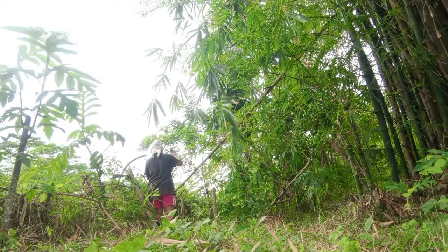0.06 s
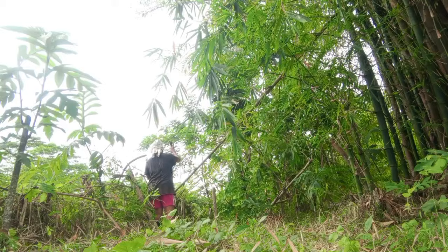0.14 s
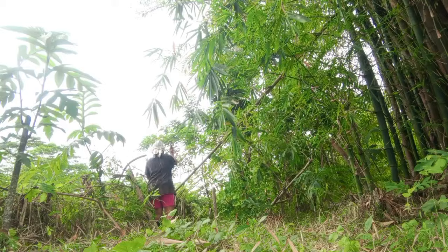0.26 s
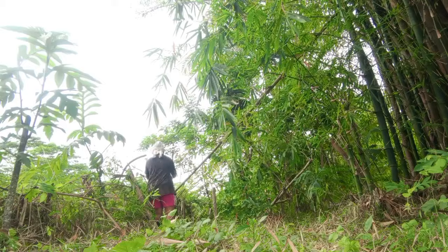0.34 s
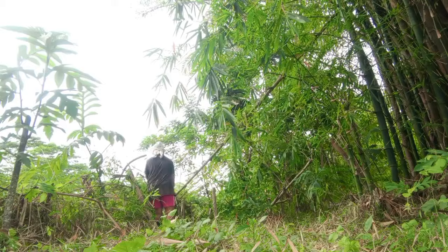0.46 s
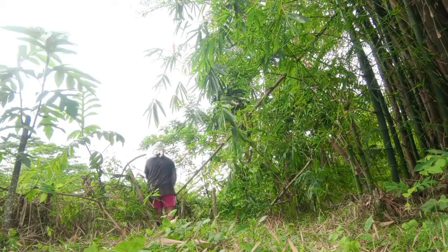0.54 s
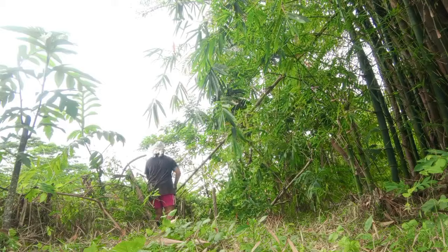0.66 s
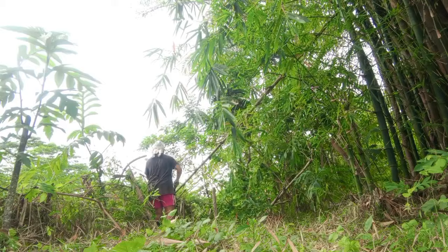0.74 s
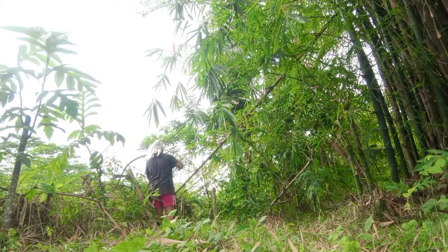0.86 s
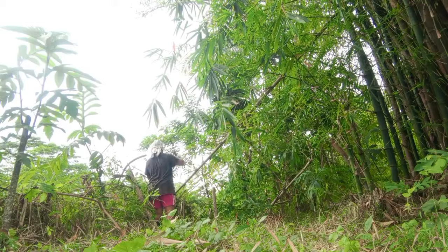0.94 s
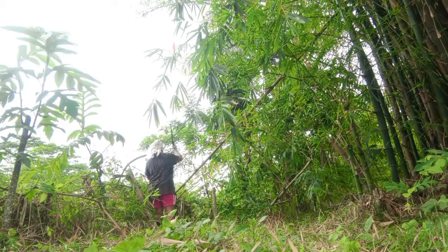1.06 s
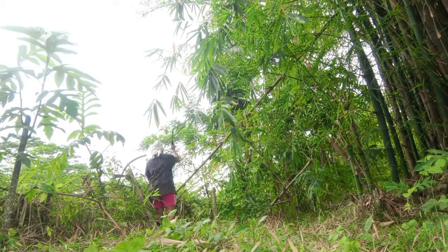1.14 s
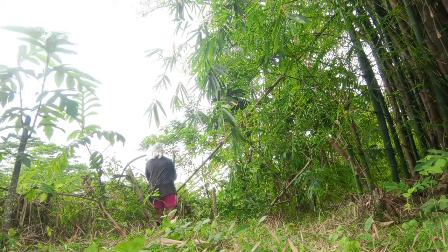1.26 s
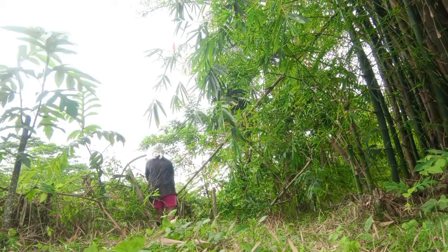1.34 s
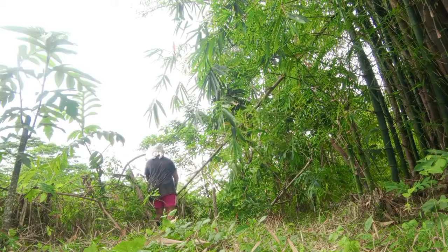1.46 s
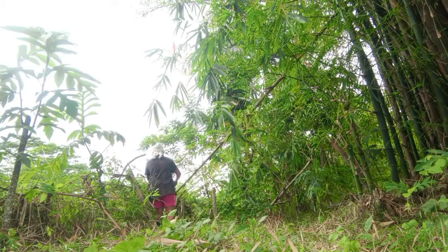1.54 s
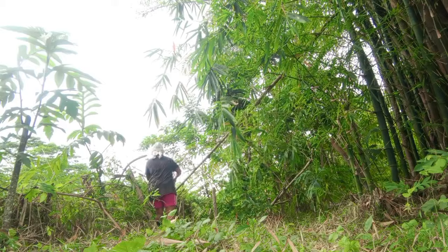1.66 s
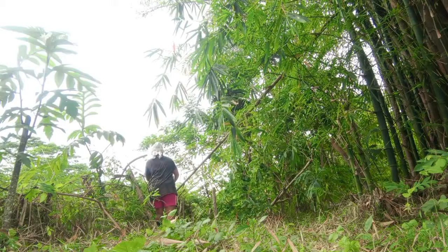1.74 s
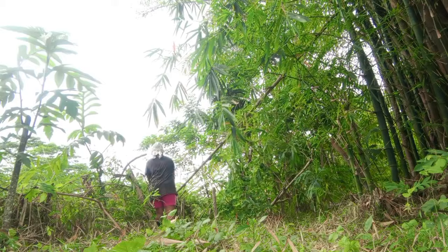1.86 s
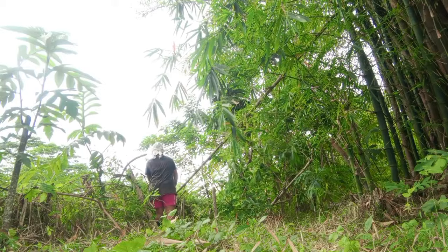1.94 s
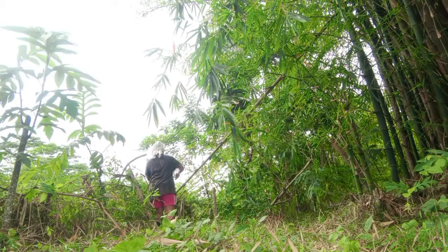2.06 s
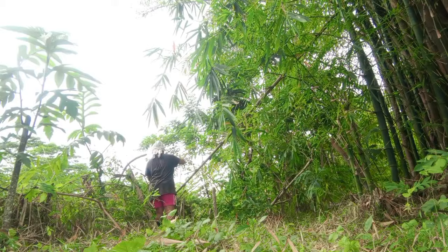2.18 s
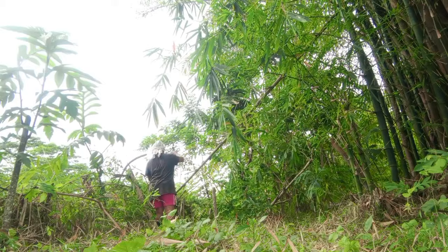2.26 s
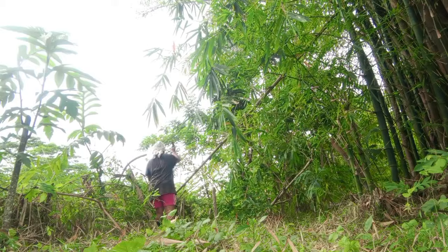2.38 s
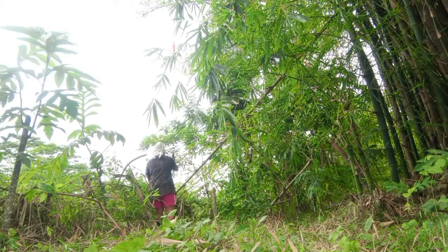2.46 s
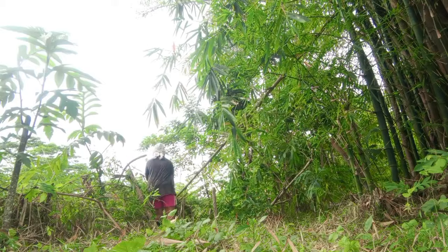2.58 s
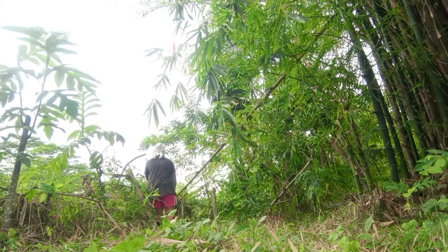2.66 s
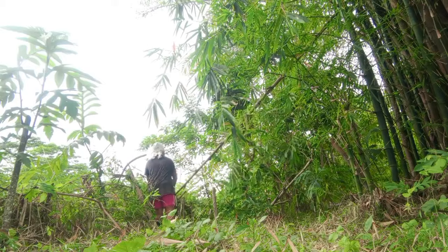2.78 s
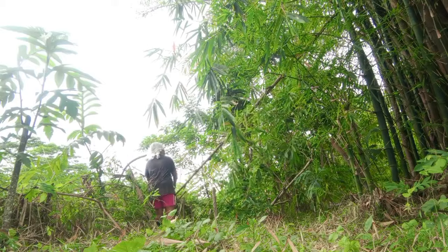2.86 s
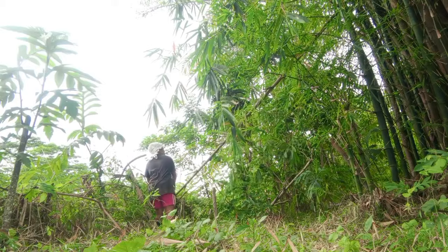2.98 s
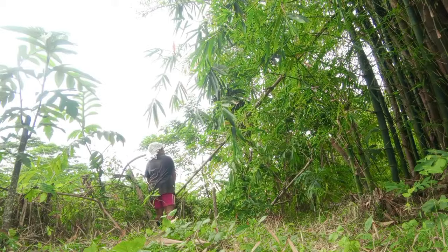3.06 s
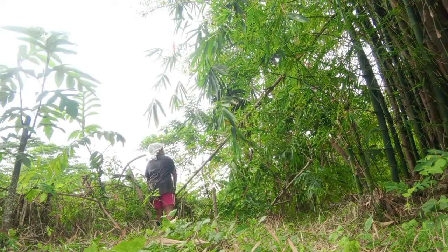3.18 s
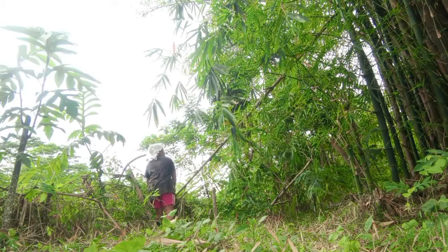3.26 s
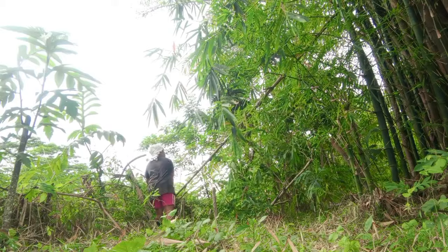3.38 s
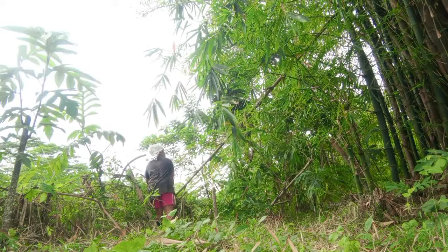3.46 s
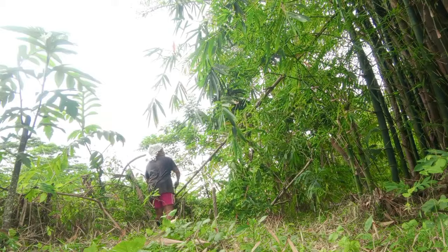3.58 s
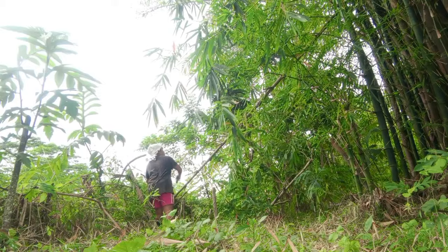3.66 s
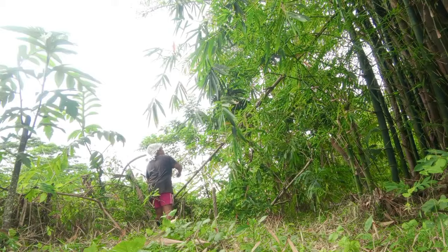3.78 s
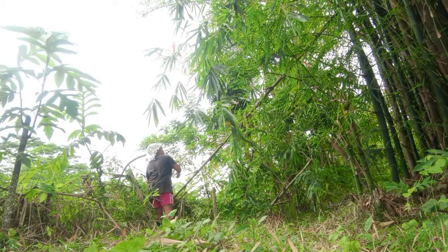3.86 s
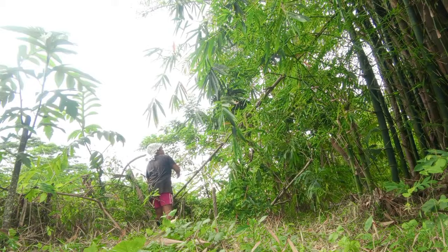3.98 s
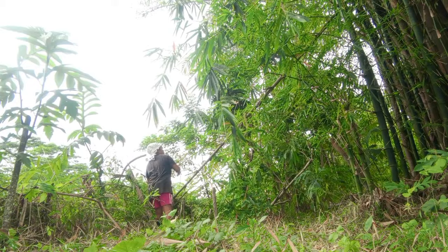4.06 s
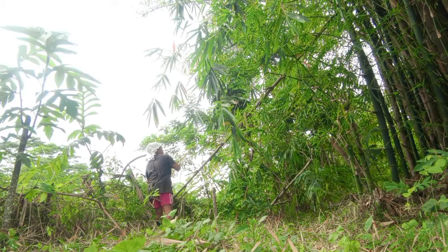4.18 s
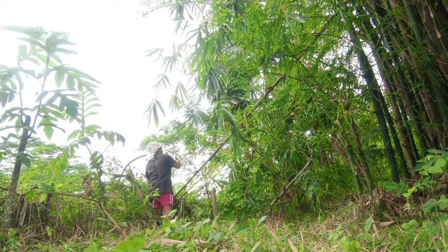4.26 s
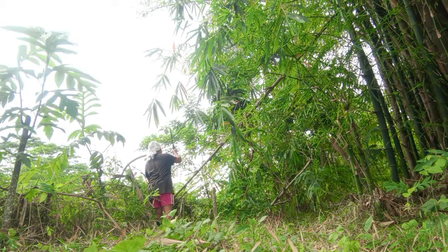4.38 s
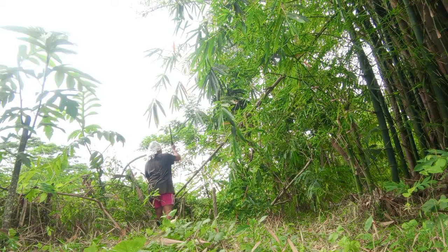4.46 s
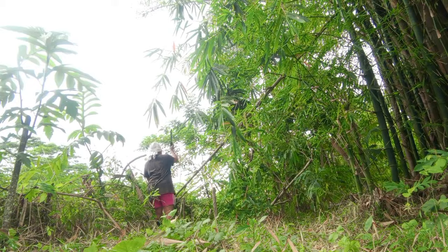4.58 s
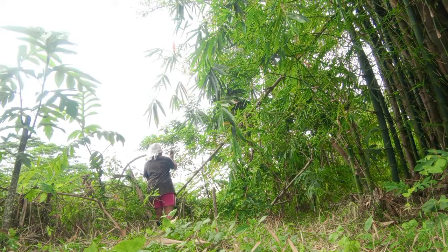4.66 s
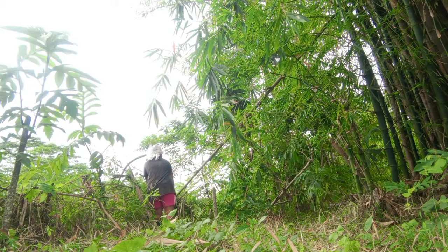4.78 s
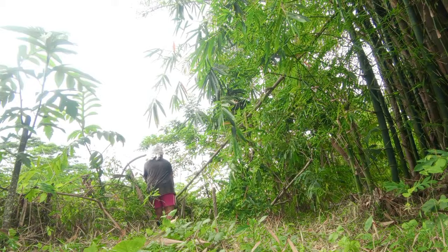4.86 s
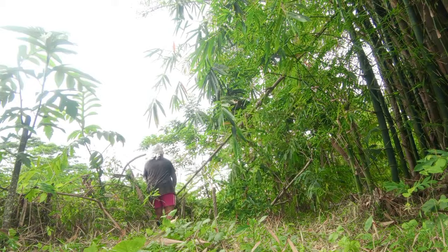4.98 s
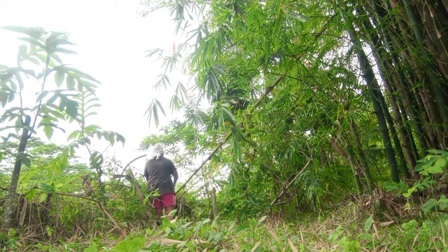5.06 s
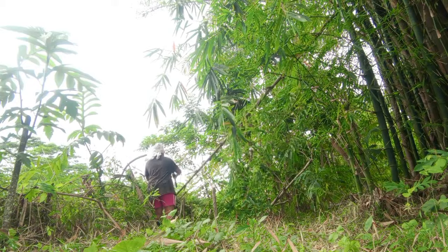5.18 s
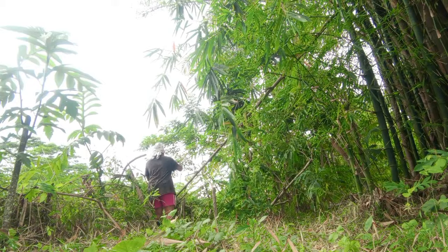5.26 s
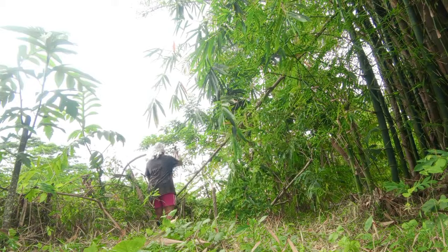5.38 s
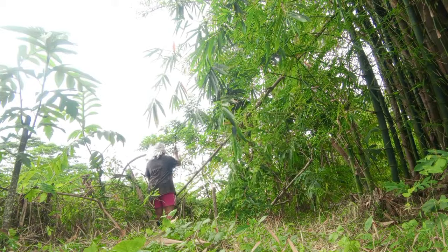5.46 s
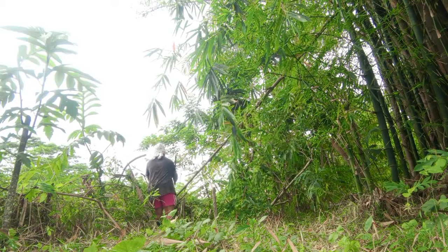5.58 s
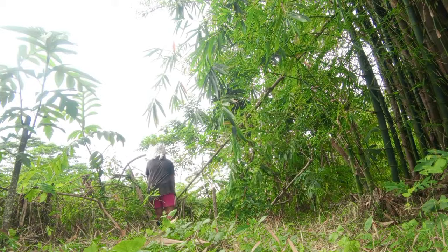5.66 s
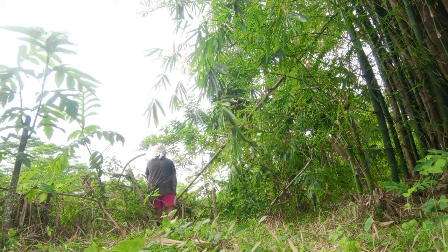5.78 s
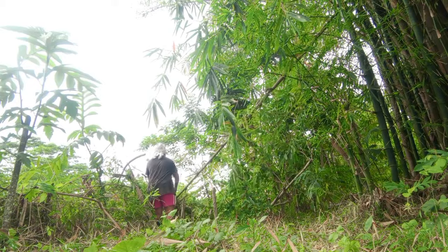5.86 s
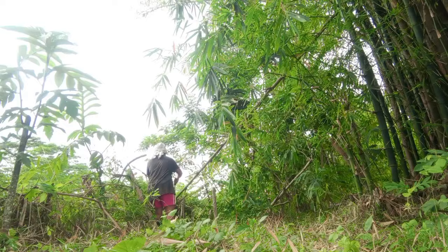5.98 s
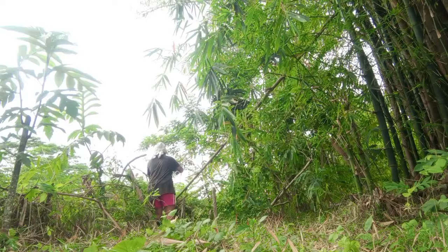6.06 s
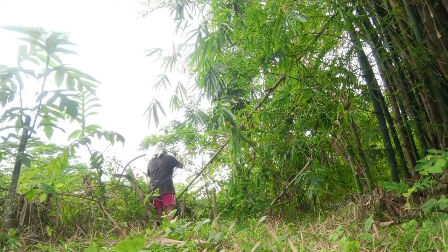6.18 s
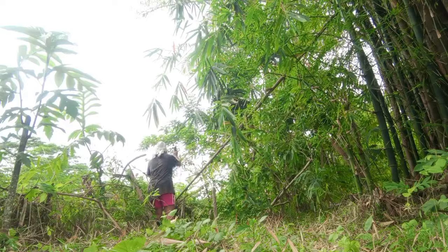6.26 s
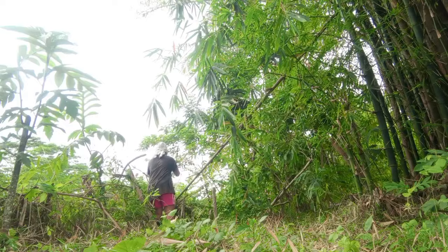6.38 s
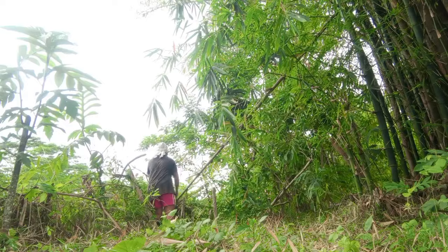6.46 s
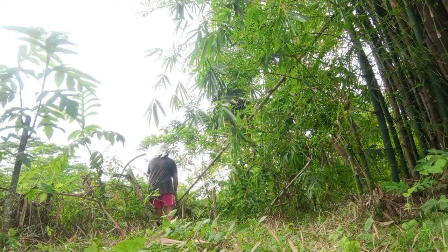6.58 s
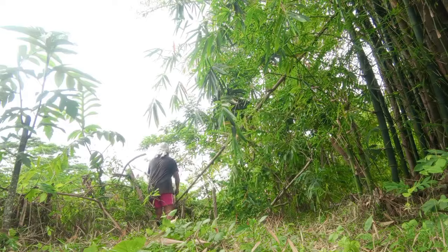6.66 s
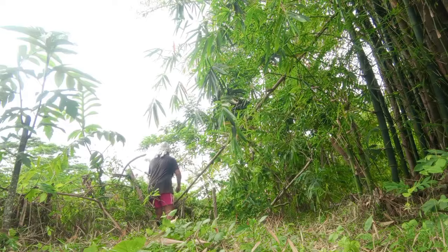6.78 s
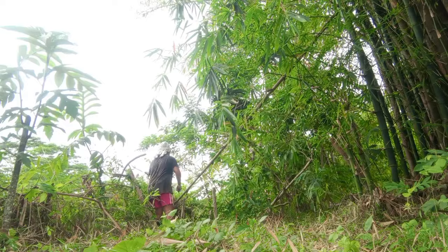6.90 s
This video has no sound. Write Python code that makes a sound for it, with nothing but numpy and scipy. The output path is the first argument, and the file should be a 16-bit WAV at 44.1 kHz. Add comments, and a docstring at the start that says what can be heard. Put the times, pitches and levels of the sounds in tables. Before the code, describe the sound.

Six sharp, hollow chops into bamboo, three then a pause then three more, with crackling splits, dropping twigs and sparse bird calls.

```python
"""Still air, a low breeze, the crackling tail of an earlier blow and faint birds; then a blade strikes bamboo six times.
Each blow is a burst of bite noise, about 30 ms of tearing fibres and a snap, while modes of the hollow stem ring.
A soft echo returns and the split cracks on, in sharp pulses and sprays of splinters; a pause follows the third blow.
Shaken leaves rustle as filtered noise, twigs drop, and birds call as gliding tones.
The grove scatters all but the air, wind and leaf rustle; a noise suppressor breaks up the quiet tails."""
import sys
import numpy as np
from scipy import signal
from scipy.io import wavfile
from scipy.ndimage import uniform_filter1d

SR = 44100
rng = np.random.default_rng(int(sys.argv[2]) if len(sys.argv) > 2 else 0)


def transcribe(u):
    """Save the signal u as a 16-bit wav file named by the first command-line argument.

    u: samples, shape (n,) or (channels, n), limited to [-1, 1]; the rate is SR.
    q: integer samples, one column per channel.
    """
    v = np.clip(np.atleast_2d(u).T, -1, 1)
    q = np.round(v * 32767).astype(np.int16)
    wavfile.write(sys.argv[1], SR, q)


N = 305613  # length of the scene in samples

# The blade blows. Each row: start in seconds, bite level in dB, tearing level in dB,
# fall over the tear in dB (negative grows), snap level in dB, time the tearing takes to die in seconds,
# ring level in dB, pitch that rings most in Hz, small cracks level in dB, shaken leaves level in dB.
CHOPS = [(0.4745, -9, -16.5, -6, -10, 0.019, -2.5, 1030, -36.5, -36),
         (1.3862, -9.5, -12, -2, -16, 0.013, -4.5, 900, -24.5, -32.5),
         (2.627, -12, -13, -5, -12, 0.0033, -4, 1194, -25, -32),
         (4.8692, -15, -10.5, -0.5, -7, 0.0082, -2, 886, -27, -33),
         (5.7217, -6, -14, 2.5, -4.5, 0.019, -6, 1450, -25.5, -34),
         (6.5534, -5.5, -11, 4.5, -10, 0.03, -6, 771, -32.5, -41.5)]


def amp(db):
    """Turns decibels into a plain multiplier."""
    return 10 ** (np.asarray(db) / 20)


def evened(x):
    """Scales a signal to an rms of 1."""
    return x / np.sqrt(np.mean(x ** 2) + 1e-20)


def read(points, hz):
    """Joins (Hz, value) points by straight lines on a log pitch axis."""
    point_hz, value = np.transpose(points)
    return np.interp(np.log(hz + 1), np.log(point_hz + 1), value)


def clock(seconds):
    """Counts the time in seconds at every sample."""
    return np.arange(int(seconds * SR)) / SR


def add(mix, s, sound):
    """Adds a sound into the mix from s seconds on, cut off where the mix ends."""
    part = mix[max(round(s * SR), 0):][:len(sound)]
    part += sound[:len(part)]


def colour(x, points, size=4096):
    """Gives a sound the spectrum drawn by the points, with a filter of unit energy that never acts early."""
    log_gain = np.log(amp(read(points, abs(np.fft.fftfreq(size, 1 / SR)))))
    # the Hilbert transform finds the phase that puts the response after its input
    response = np.exp(np.conj(signal.hilbert(log_gain)))
    taps = np.fft.ifft(response).real[:size // 2]
    return signal.oaconvolve(x, taps / np.linalg.norm(taps))[:len(x)]


def blur(field, size):
    """Averages a short-time spectrum over (pitch bins, time frames)."""
    over_bins = uniform_filter1d(field, size[0], axis=-2)
    return uniform_filter1d(over_bins, size[1], axis=-1)


def wobble(count, size):
    """Smooths noise over some samples into a slow random drift of rms 1."""
    return evened(uniform_filter1d(rng.standard_normal(count), size=size))


def fibres(t, spread_db):
    """Makes dense tiny fractures of random sign and size, rms 1."""
    sizes = amp(spread_db * np.minimum(rng.exponential(1, len(t)), 4))
    return evened(rng.standard_normal(len(t)) * sizes)


def burst(t, start, length, spectrum):
    """A cluster of fractures starts at once and dies quickly; its energy is that of rms 1 over its length."""
    envelope = (t >= start) * np.exp(-((t - start) / length) ** 2)
    x = colour(fibres(t, 3) * envelope, spectrum)
    return x / np.linalg.norm(x) * np.sqrt(length * SR)


def air():
    """Still outdoor air hisses steadily, while low wind rumbles and swells in puffs on the microphone."""
    # Spectrum of still air. Each row: pitch in Hz, level in dB per Hz.
    air_colour = [(20, -18), (45, -11), (70, -3.5), (150, -3), (300, -9.5), (900, -14.5), (1500, -12),
                  (2400, -21), (4500, -18), (9000, -23), (11500, -15.5), (13800, -20), (15500, -15.5)]
    # Spectrum of the wind rumble. Each row: pitch in Hz, level in dB.
    wind_colour = [(20, -21), (60, -5.5), (100, 0), (145, -2), (220, -21), (500, -35.5), (2000, -72)]
    # Puffs of wind. Each row: time of the peak in seconds, half width in seconds, level in dB.
    puffs = [(1.761, 0.033, -51), (2.95, 0.059, -57), (3.891, .025, -61), (6.0, .05, -53),
             (6.3, 0.16, -49.5), (6.87, 0.18, -46)]
    air_db, breeze_db = -57, -75  # the breeze is the rumble between puffs
    t = np.arange(N) / SR
    gusts = amp(breeze_db) + sum(amp(db) * np.exp(-((t - s) / width) ** 2) for s, width, db in puffs)
    still = amp(air_db) * colour(rng.standard_normal(N), air_colour)
    wind = gusts * colour(rng.standard_normal(N), wind_colour)
    return still + wind


def twig(db, hz, length, tones_db=-2, tones_t60=.2):
    """Dry leaves crackle in a broad band around one pitch; three steady tones near it fade under the crackle."""
    t = clock(.4)
    band = [(hz / 10, -22), (hz / 2, -6), (hz, 0), (hz * 1.3, -5), (hz * 2, -15), (SR / 2, -19)]
    crackle = colour(fibres(t, 3), band) * np.exp(-t / length)
    tones = sum(np.sin(2 * np.pi * hz * ratio * t) for ratio in (.72, .77, 1.05)) / 3
    fading = amp(tones_db) * tones * np.exp(-np.log(1000) * t / tones_t60)  # 60 dB in tones_t60 seconds
    onset = 1 - np.exp(-t / 0.0019)
    return amp(db) * (crackle + fading) * onset


def bird(length, start_hz, end_hz, db, waver=.016):
    """A thin whistle glides from one pitch to another, unsteady on the way."""
    t = clock(length)
    hz = np.geomspace(start_hz, end_hz, len(t)) * (1 + waver * wobble(len(t), 120))
    whistle = np.sin(2 * np.pi * np.cumsum(hz) / SR)
    return amp(db) * whistle * signal.windows.tukey(len(t), .7)


def grove(x):
    """Many stems scatter a sound: sparse random echoes, each pitch band dying at its own speed."""
    # Dying away of the grove. Each row: pitch in Hz, time to fall by 60 dB in seconds.
    grove_t60 = [(80, .9), (250, .55), (600, .8), (2000, .92), (6000, 1.0), (12000, .9)]
    # Strength of the grove. Each row: pitch in Hz, level of what it returns in dB.
    grove_db = [(80, -12), (250, -4), (600, -8.5), (2500, -14.5), (6000, -9), (12000, -15)]
    t = clock(1.2)
    signs = rng.choice([-1., 1.], len(t))
    hits = rng.random(len(t)) < 3000 / SR  # about 3000 echoes a second
    taps = signs * hits * (1 - np.exp(-t / 0.0039))
    hz, at, z = signal.stft(evened(taps), SR, nperseg=256)
    t60 = read(grove_t60, hz)[:, None]
    decay = amp(read(grove_db, hz)[:, None] - 60 * at / t60)
    even_energy = np.sqrt(2 * np.log(1000) / (t60 * SR))  # a longer decay brings no extra energy
    response = signal.istft(z * decay * even_energy, SR, nperseg=256)[1]
    response[0] += 1  # the direct sound
    return signal.fftconvolve(x, response)


def culm(t, favoured_hz, favour_db=6, octaves=0.29, rise_s=0.0045):
    """The hollow stem rings in many modes; where the blade lands decides which speak most."""
    # Modes of the stem. Each row: pitch in Hz, level in dB, time to fall by 60 dB in seconds.
    modes = [(132, -25, 0.16), (193, -25.5, 0.16), (243.7, -25.5, 0.21), (427.4, -21.5, 0.14),
             (521.7, -23.5, 0.13), (636, -21, 0.07), (738, -19, 0.13), (855, -20, .16), (970, -29, 0.11),
             (1017, -21.5, 0.14), (1152, -11, 0.07), (1360.5, -11, 0.1), (1575, -13, 0.14),
             (1644, -18.5, 0.099), (1847, -8, 0.12), (2177, -16.5, 0.1), (2690, -24, 0.027),
             (3050, -18, .08), (3020, -24.5, 0.18), (3150, -18.5, 0.27), (3920, -19.5, .12),
             (4190, -26, 0.36)]
    hz, db, t60 = np.transpose(modes)[:, :, None]
    db = db + favour_db * np.exp(-(np.log2(hz / favoured_hz) / octaves) ** 2)
    detune = 1 + .012 * rng.standard_normal(hz.shape)  # each ring is slightly out of tune
    ringing = np.sin(2 * np.pi * (hz * detune * t + rng.random(hz.shape)))
    dying = np.exp(-np.log(1000) * t / t60)
    return (amp(db) * dying * ringing).sum(0) * (1 - np.exp(-t / rise_s))


def chop(bite_db, tear_db, fade_db, snap_db, dying_s, ring_db, favoured_hz, knock_db=-11, knock_t60=0.089):
    """The edge bites, tears through fibres, and the last of them snap as it stops."""
    # Spectrum of the blade's bite. Each row: pitch in Hz, level in dB per Hz.
    bite_colour = [(40, -15.5), (200, -11.5), (500, -4.5), (1000, -11), (1500, 2.5), (2400, -13.5),
                   (4000, -2), (5000, -11.5), (6200, -1), (8000, -21), (11000, -16.5), (14000, -19.5),
                   (15500, -8)]
    # Spectrum of tearing fibres. Each row: pitch in Hz, level in dB per Hz.
    tear_colour = [(30, -20.5), (130, -7), (320, -11.5), (800, 1.5), (1800, 1.5), (2800, -4), (4500, -6.5),
                   (6400, -5.5), (8200, -20.5), (10000, -24.5), (12000, -21), (14000, -31.5),
                   (15300, -24.5)]
    tear_s = .029  # how long the blade tears before it stops
    t = clock(.25)
    bite = amp(bite_db) * burst(t, 0, 0.0057, bite_colour)
    cutting = amp(-fade_db * np.minimum(t / tear_s, 1))
    dying = np.exp(-np.maximum(t - tear_s, 0) / dying_s)
    tear = amp(tear_db) * colour(fibres(t, 3.5) * cutting * dying, tear_colour)
    snap = amp(snap_db) * burst(t, tear_s - .0015, .0018, tear_colour)
    # the struck length of wall gives the blow its woody pitch
    knock = np.sin(2 * np.pi * favoured_hz * t) * np.exp(-np.log(1000) * t / knock_t60)
    knock = knock * (1 - np.exp(-t / 0.0024))
    ring = amp(ring_db) * (culm(t, favoured_hz) + amp(knock_db) * knock)
    return bite + tear + snap + ring


def leaves(settle_db_per_s=36):
    """Every blow shakes the crown, whose rustle flutters and settles."""
    # Spectrum of rustling leaves. Each row: pitch in Hz, level in dB per Hz.
    leaf_colour = [(200, -27.5), (900, -20.5), (1800, -7.5), (3000, -2), (6400, 2), (8500, -10.5),
                   (10000, -10), (12000, -6.5), (13800, -10.5), (15300, -4)]
    t = np.arange(N) / SR
    shake = sum((t > s) * amp(db - settle_db_per_s * abs(t - s)) for s, *_, db in CHOPS)
    flutter = amp(1.4 * wobble(N, 1500))  # 1.4 dB rms
    return shake * flutter * colour(fibres(t, 3), leaf_colour)


def pulse(t, hz, cycles=0.535):
    """One stiff release swings the air pressure for about a cycle and a half."""
    u = t * hz - 1  # cycles from the middle of the swing
    return -np.cos(2 * np.pi * u) * np.exp(-(u / cycles) ** 2)


def crack(pulse_db, hz, splinters_db, ring_db=-7, favoured_hz=580):
    """One sharp pulse and a spray of splinters, as when the split jumps on, set the hollow stem ringing."""
    # Spectrum of a spray of splinters. Each row: pitch in Hz, level in dB per Hz.
    splinter_colour = [(100, -21.5), (350, -11), (650, -4), (1200, -1.5), (1900, 1.5), (3000, -4),
                       (4500, -9.5), (6400, -12.5), (8200, -28.5), (15000, -43)]
    # the more of a crack goes into its pulse, the shorter its spray
    equal_spray_s, halving_db = .0078, 13.5  # length at equal levels; lead of the pulse that halves it
    t = clock(.2)
    spray_s = equal_spray_s * 2 ** ((splinters_db - pulse_db) / halving_db)
    spray = burst(t, 0.0006, spray_s, splinter_colour)
    spray = spray + 0.3 * burst(t, 0.0058, 0.023, splinter_colour)  # a weaker, longer second spray
    ring = amp(ring_db) * culm(t, favoured_hz, favour_db=17, octaves=0.4, rise_s=0.0028)
    return amp(pulse_db) * pulse(t, hz) + amp(splinters_db) * (spray + ring)


def spread_times(from_s, to_s, count):
    """Picks random moments, one in each equal part of a span."""
    return from_s + (to_s - from_s) * (np.arange(count) + rng.random(count)) / count


def aftermath(small_db, pulse_lead_db=4):
    """After every blow an echo returns, the split runs on in small cracks, and twigs drop from the crown."""
    out = np.zeros(2 * SR)
    # a soft, splintery echo returns from the stems 61 ms after the bite; levels in dB over the small cracks
    echo_s, echo_pulse_db, echo_splinters_db, echo_hz = .061, 6, 9, 1700
    add(out, echo_s, crack(small_db + echo_pulse_db, echo_hz, small_db + echo_splinters_db))
    # small cracks at random while the split runs on
    run_from_s, run_to_s, small_hz, scatter_db = .085, .25, 1540, 3
    for s in spread_times(run_from_s, run_to_s, count=3):
        db = small_db + scatter_db * rng.uniform(-1, 1)
        hz = small_hz * 2 ** rng.uniform(-.5, .5)
        add(out, s, crack(db + pulse_lead_db, hz, db))
    # faint twigs drop at random some time later
    drop_from_s, drop_to_s, drop_db, drop_length_s = 0.55, 0.69, -53, 0.014
    low_hz, high_hz = 2400, 5990
    for s in spread_times(drop_from_s, drop_to_s, count=2):
        hz = low_hz * (high_hz / low_hz) ** rng.random()
        add(out, s, twig(drop_db, hz, drop_length_s))
    return out


def sweep(length, db, dip_db=6):
    """A high call starts level and fairly clean, then sweeps up and grows ragged, weaker in its middle."""
    from_hz, to_hz, bend = 4400, 6500, 2.8  # a bend above 1 steepens the rise towards the top
    u = clock(length) / length
    unsteady = 1 + (.01 + .04 * u) * wobble(len(u), 200)
    hz = from_hz * (to_hz / from_hz) ** (u ** bend) * unsteady
    level = amp(db - dip_db * np.sin(np.pi * u) ** 2)
    return level * np.sin(2 * np.pi * np.cumsum(hz) / SR) * signal.windows.tukey(len(u), .25)


def scene():
    """Lays the timed sounds, each scattered by the grove, over the air and leaves."""
    # Clearest twigs and dry leaves; the first row is the fading tail of an earlier blow.
    # Each row: start in seconds, level in dB, centre pitch in Hz, length in seconds.
    twigs = [(0.002, -42.5, 3170, 0.1), (0.095, -37.5, 5880, 0.042), (0.911, -47, 6140, 0.062),
             (1.048, -46.5, 5230, 0.03), (1.901, -46.5, 4005, 0.03), (3.212, -43, 4184, 0.018),
             (5.344, -42, 2480, 0.024), (5.546, -40, 4390, 0.011), (6.046, -33.5, 4000, 0.03),
             (6.147, -37.5, 4100, 0.025), (6.291, -50.5, 2250, 0.11)]
    # Plain bird whistles, each sagging in pitch. Each row: start in seconds, length in seconds,
    # start pitch in Hz, end pitch in Hz, level in dB.
    whistles = [(0.06, 0.081, 1219, 1112, -49.5), (0.18, 0.23, 1700, 1650, -54),
                (2.22, 0.21, 1273, 1110, -61.5), (4.782, 0.04, 3514, 3400, -58.5),
                (5.515, 0.097, 1244, 1080, -58)]
    # Cracks of the splitting stem, and one soft far knock in the pause. Each row: start in seconds,
    # pulse level in dB, pulse pitch in Hz, splinters level in dB.
    cracks = [(0.621, -21, 970, -31.5), (1.467, -2, 1760, -15), (1.4959, -2.5, 1770, -14.5),
              (1.5324, -5.5, 2100, -15), (1.5844, -10, 1790, -21), (2.7470, -1, 1800, -14),
              (2.783, -10.5, 1500, -16.5), (2.827, -18, 1610, -23), (4.085, -44, 750, -50.5),
              (4.9928, -6, 1920, -15), (5.0365, -10, 1980, -18.5), (5.0679, -4.5, 2740, -15.5),
              (5.803, -5.5, 1710, -23.5), (5.855, -3.5, 2110, -17.5), (5.904, -11, 1510, -19),
              (5.949, -14, 1010, -25), (6.672, -11, 1650, -19.5), (6.7733, -15.5, 1160, -26.5)]
    # Another bird's upward sweeps. Each row: start in seconds, length in seconds, level in dB.
    sweeps = [(4.587, 0.18, -58), (5.963, .118, -35)]
    mix = air() + leaves()
    blows = [row[:-2] for row in CHOPS]  # the last two columns drive the small cracks and the leaves
    followers = [(s, small_db) for s, *_, small_db, leaves_db in CHOPS]
    sources = ((twig, twigs), (bird, whistles), (chop, blows),
               (aftermath, followers), (crack, cracks), (sweep, sweeps))
    for source, table in sources:
        for s, *settings in table:
            add(mix, s, grove(source(*settings)))
    return mix[None]


def suppress(x, depth_db=16, knee_db=3.0):
    """A noise suppressor turns down quiet bands; its threshold wanders, so tails break into patches."""
    # Level under which the suppressor shuts. Each row: pitch in Hz, level in dB per Hz.
    quiet = [(30, -74.5), (100, -80), (400, -79.5), (620, -87.5), (850, -78.5), (1500, -88.5),
             (4500, -90.5), (9000, -101), (15000, -101)]
    hz, _, z = signal.stft(x, SR, nperseg=1024, noverlap=768)
    power = abs(blur(abs(z) ** 2, size=(3, 5)))
    level_db = 10 * np.log10(power / hz[1] + 1e-20)  # hz[1] is the width of a band
    patches = evened(blur(blur(rng.standard_normal(z.shape), size=(4, 18)), size=(3, 10)))
    wander_size_db = read([(100, 3), (500, 6), (5000, 6), (9000, 2)], hz)[:, None]
    threshold_db = read(quiet, hz)[:, None] + wander_size_db * np.clip(patches, -1.6, 2.5)
    shut = .5 - .5 * np.tanh((level_db - threshold_db) / (2 * knee_db))  # 0 is open, 1 is shut
    return signal.istft(z * amp(-depth_db * shut), SR, nperseg=1024, noverlap=768)[1][:, :N]


def record(dry, low_cut_hz=54):
    """The microphone cuts the lows, noise is suppressed, peaks are rounded near full scale, treble is cut."""
    edge_hz = 15950  # top of the band that is kept
    low_cut = signal.lfilter(*signal.butter(2, low_cut_hz, "high", fs=SR), dry)
    x = suppress(low_cut)
    rounded = x / (1 + x ** 6) ** (1 / 6)
    band_limit = signal.firwin(401, edge_hz, window=("kaiser", 8), fs=SR)
    return signal.oaconvolve(rounded, band_limit[None], "same")


dry = scene()
out = record(dry)
transcribe(out)
```